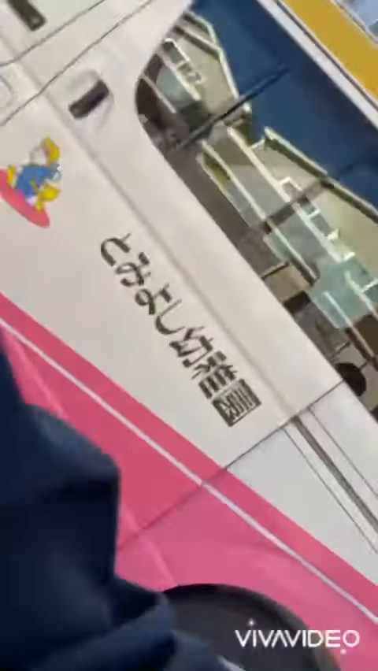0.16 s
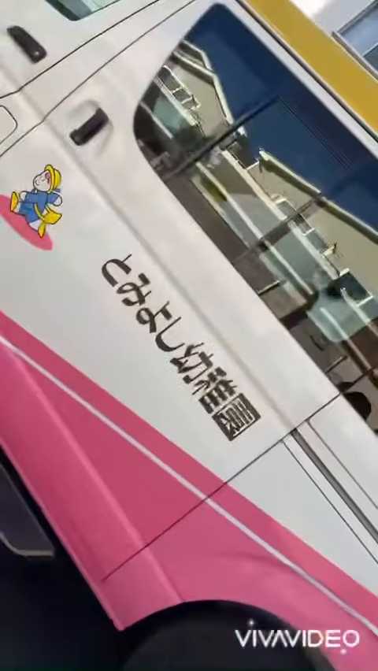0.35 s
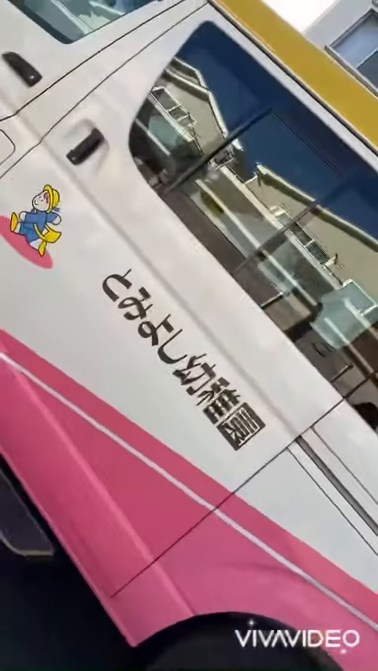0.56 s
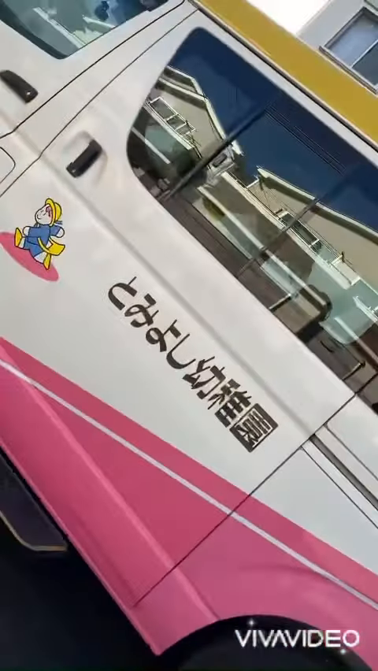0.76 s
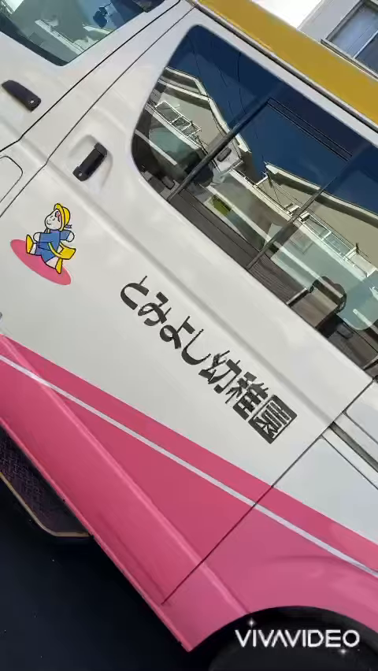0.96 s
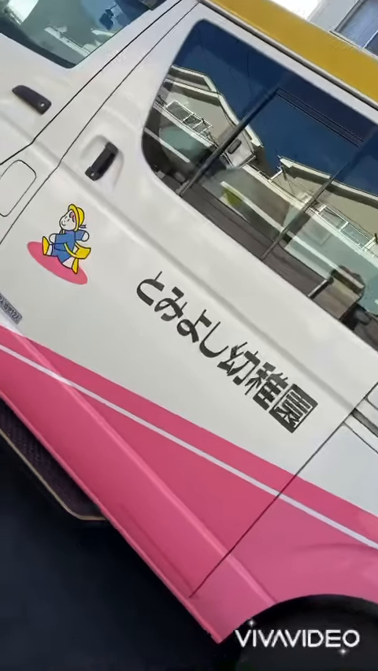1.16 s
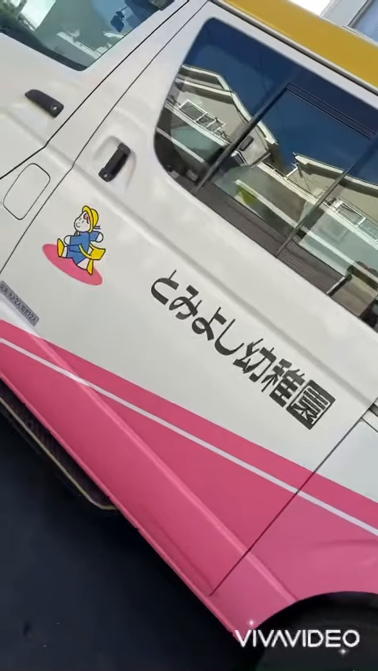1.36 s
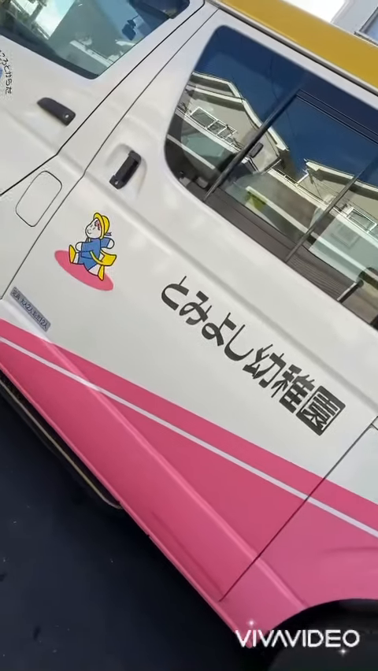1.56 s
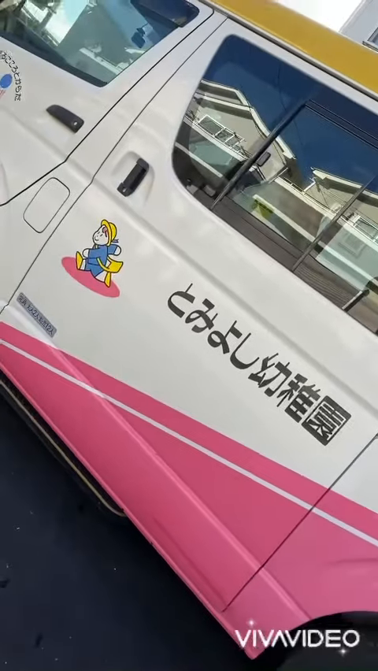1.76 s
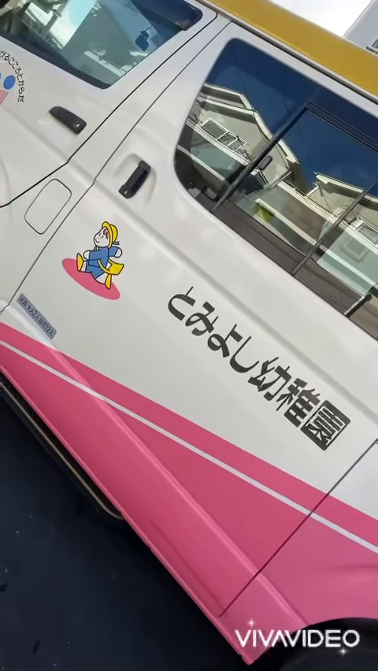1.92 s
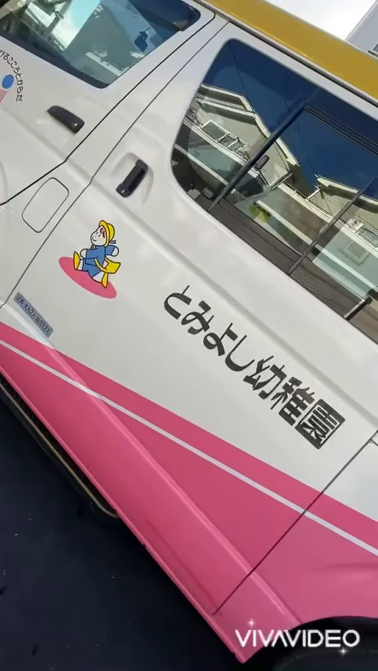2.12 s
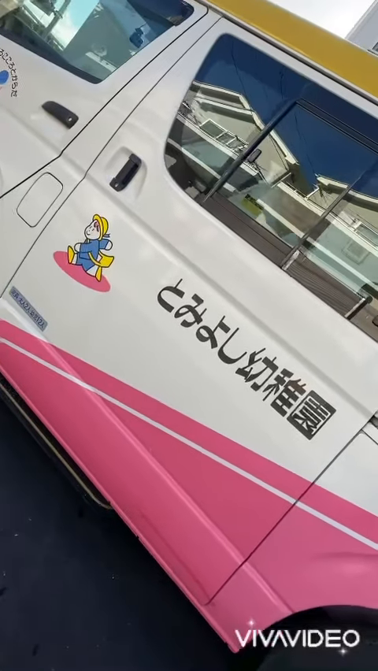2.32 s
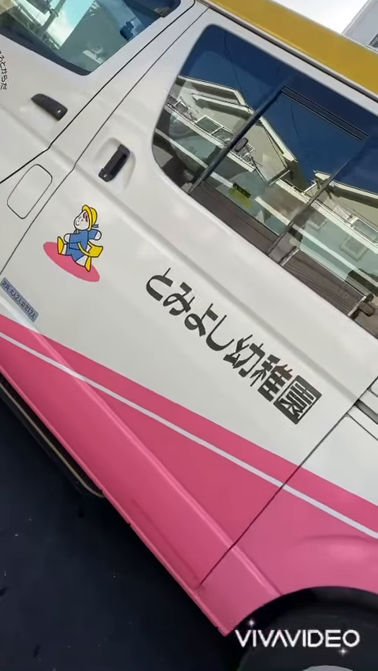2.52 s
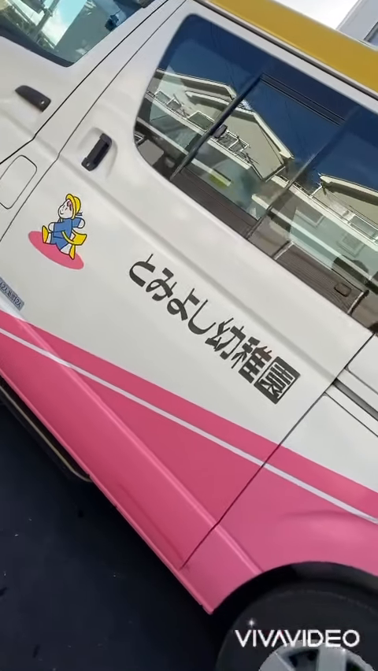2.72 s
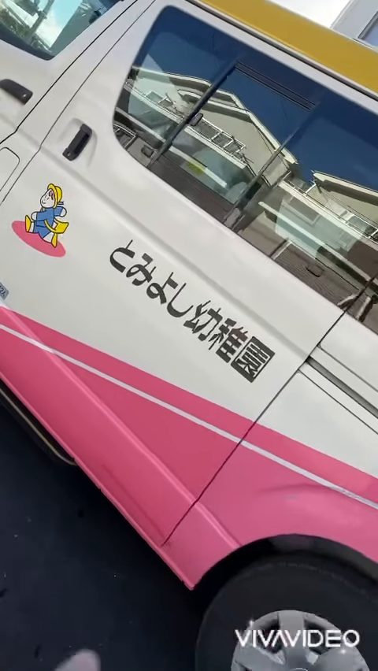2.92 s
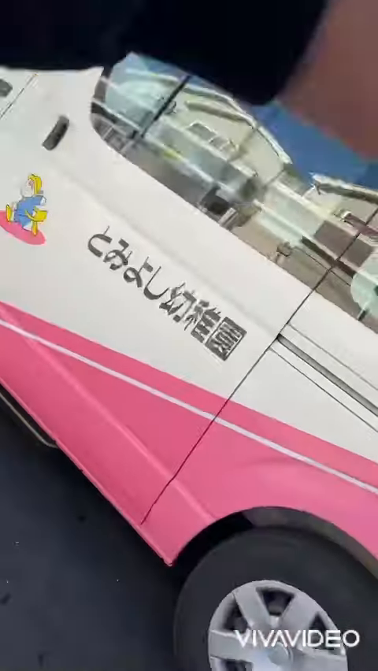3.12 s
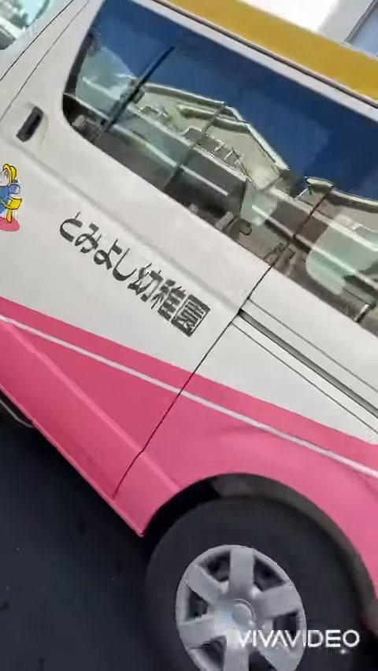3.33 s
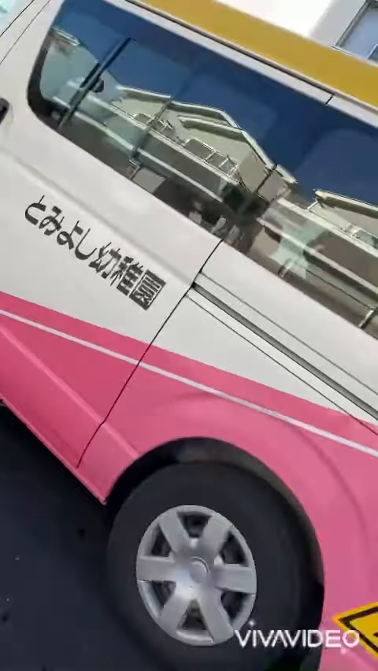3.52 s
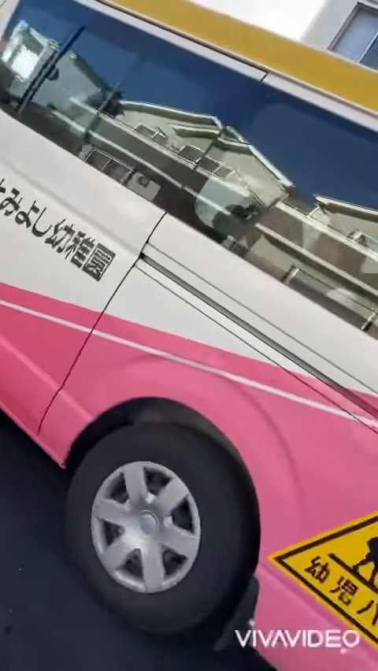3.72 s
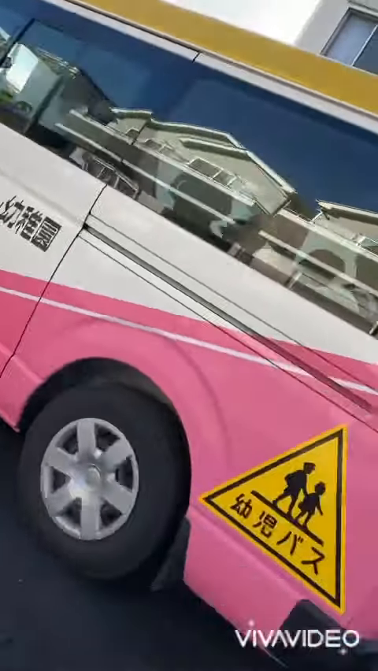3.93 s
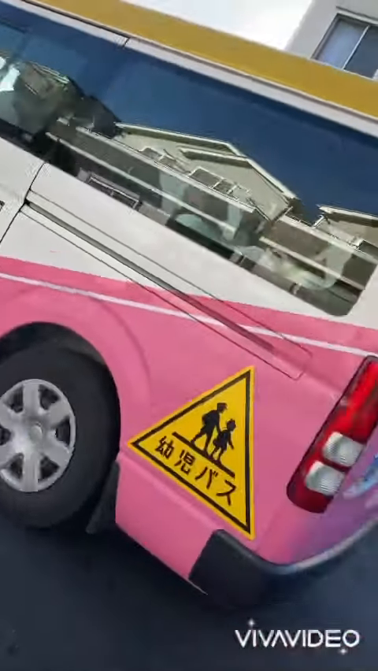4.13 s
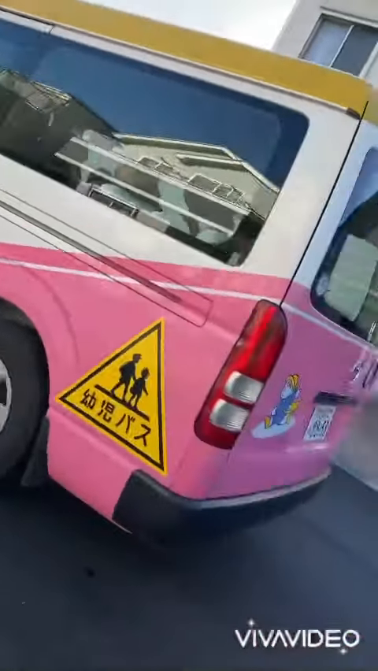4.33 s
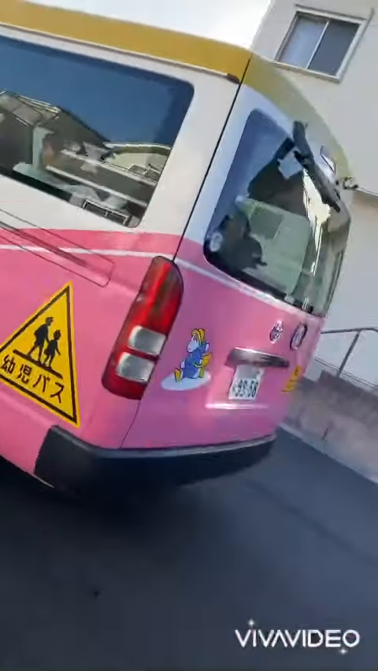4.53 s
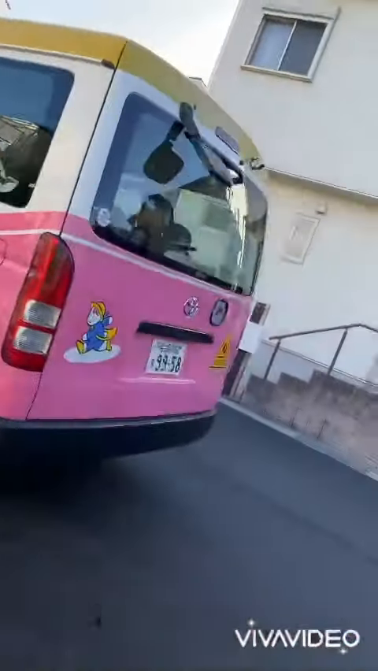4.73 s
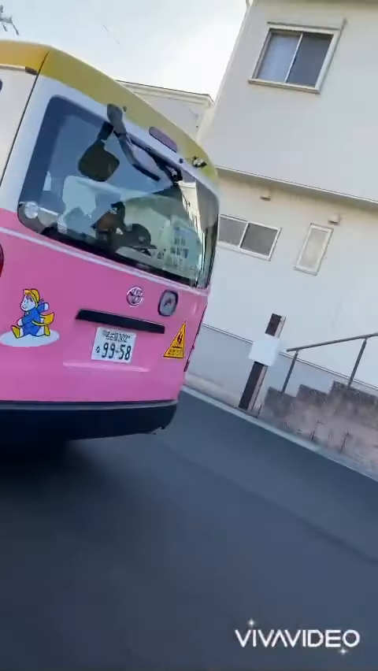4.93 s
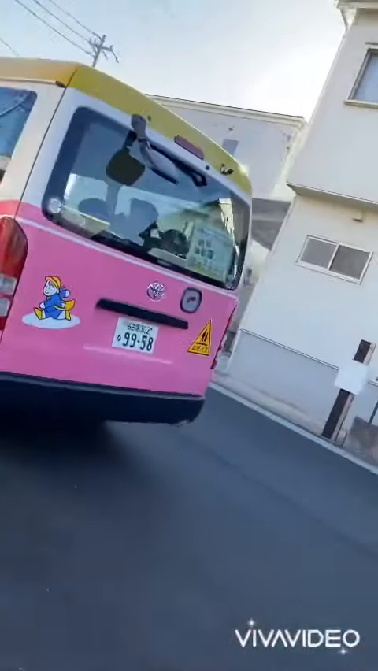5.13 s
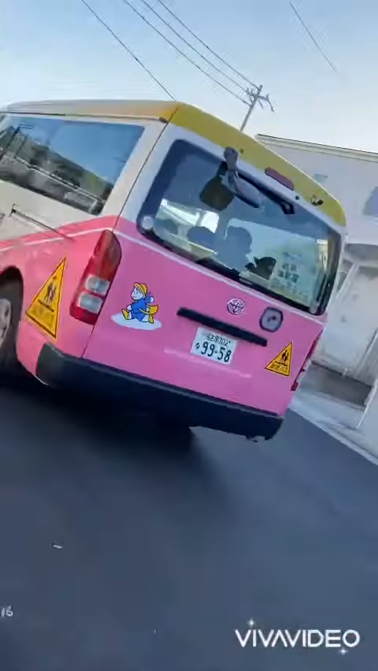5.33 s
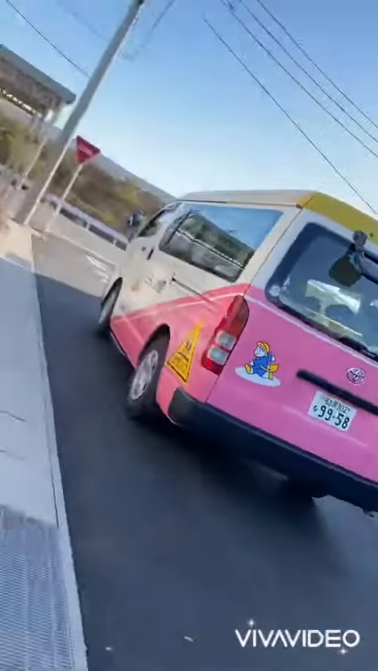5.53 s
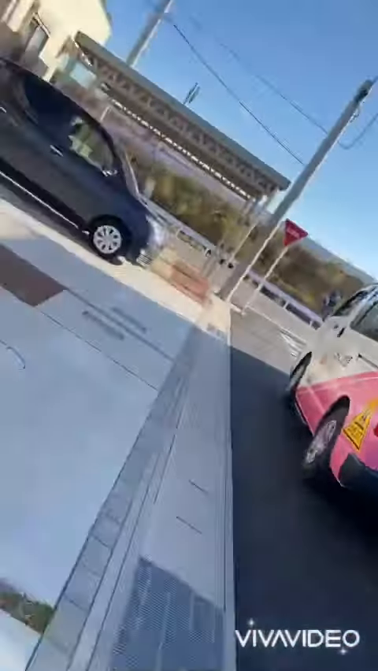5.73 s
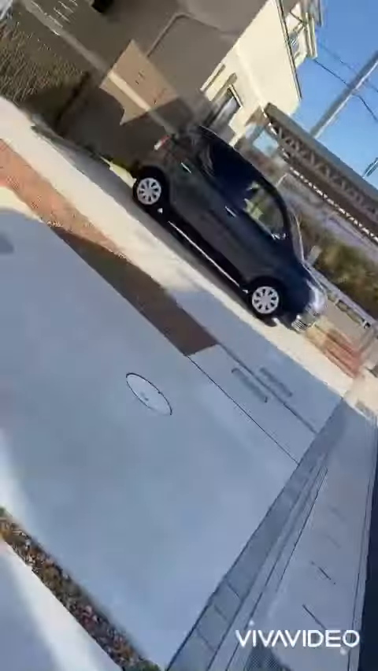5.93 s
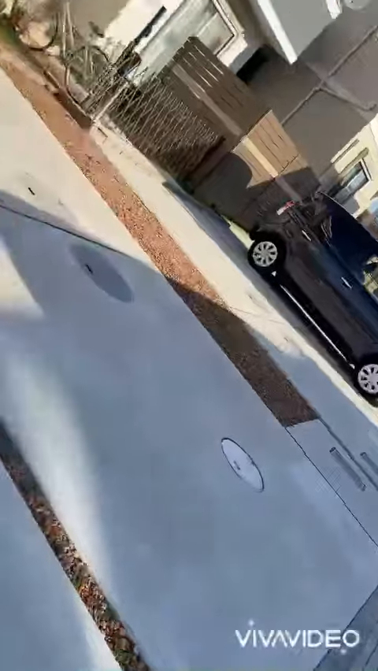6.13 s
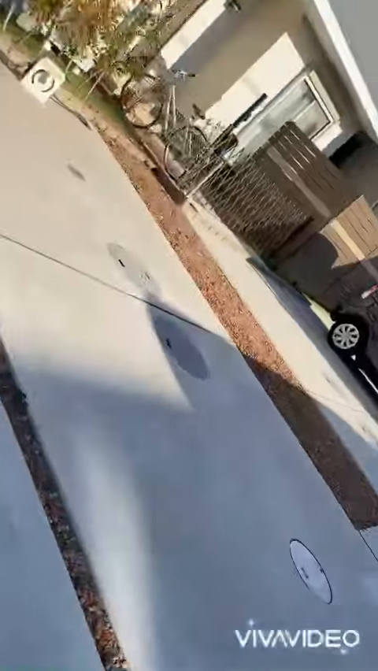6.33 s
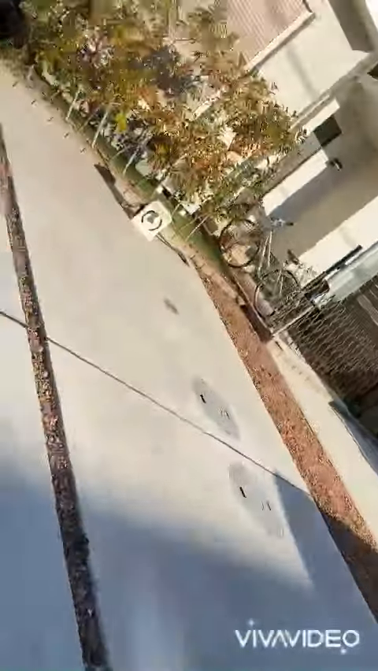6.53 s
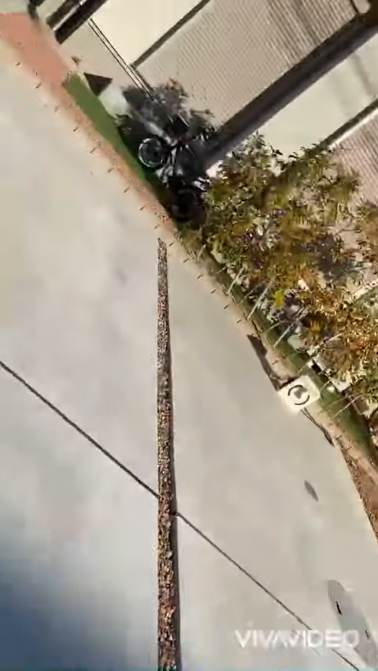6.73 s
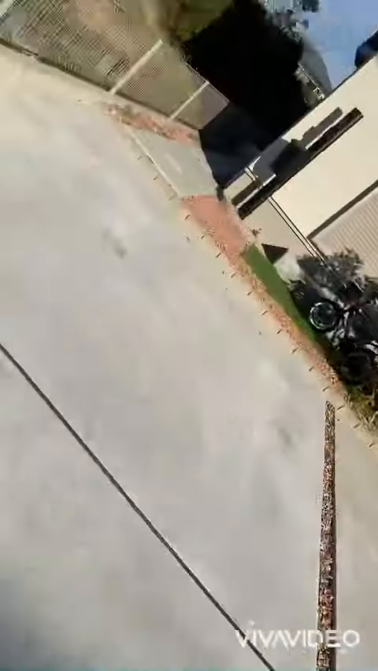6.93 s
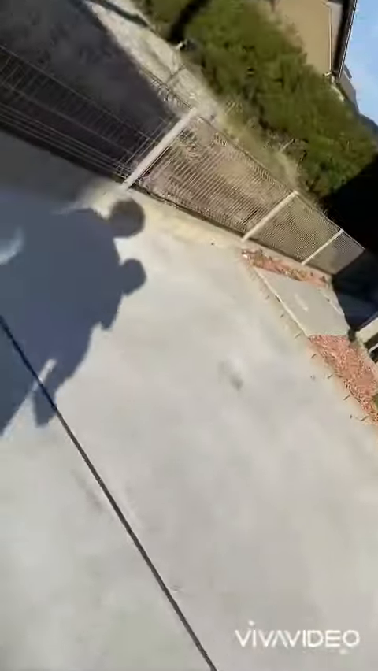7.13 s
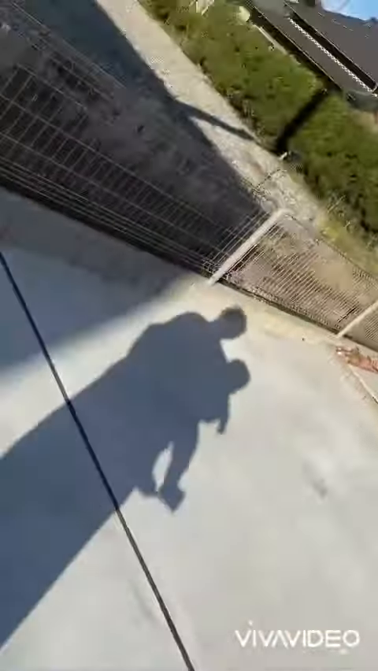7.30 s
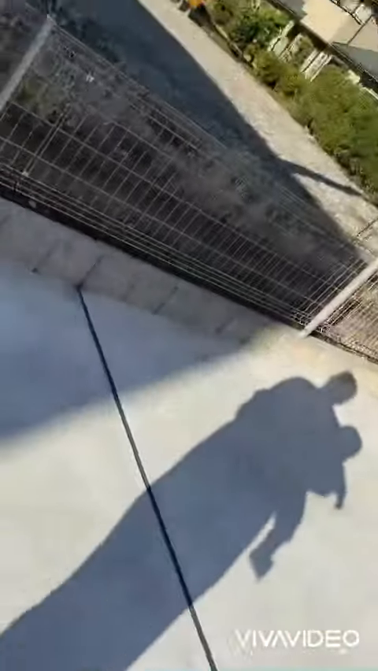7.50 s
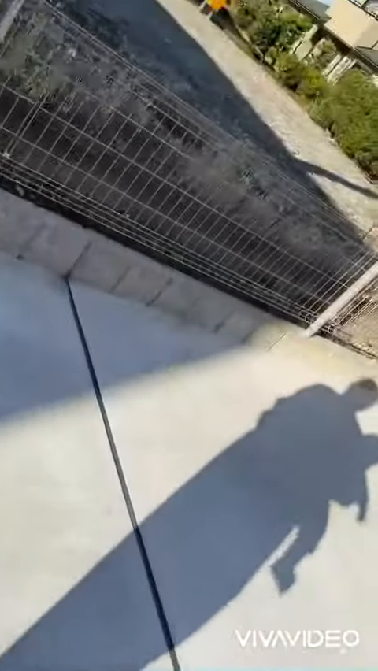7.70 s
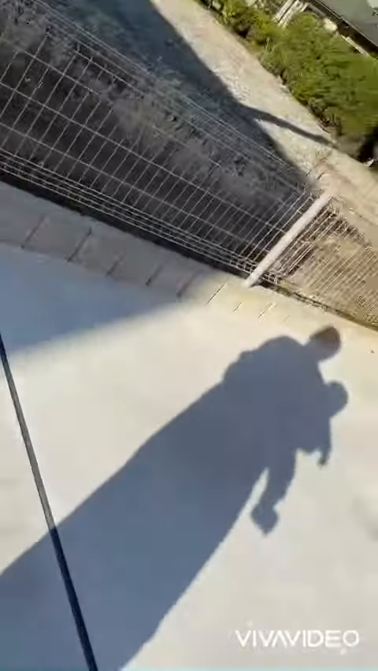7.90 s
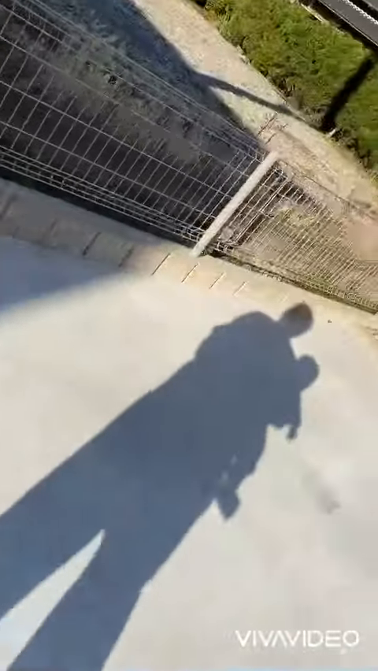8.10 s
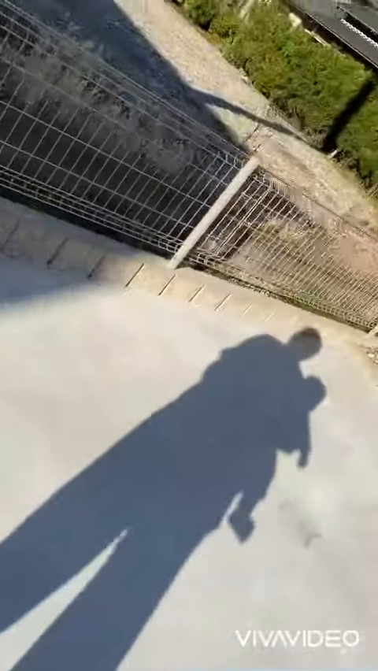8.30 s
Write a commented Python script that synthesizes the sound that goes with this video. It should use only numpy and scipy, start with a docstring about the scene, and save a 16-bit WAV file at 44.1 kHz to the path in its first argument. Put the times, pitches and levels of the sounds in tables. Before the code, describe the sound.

A minibus's sliding door rolls and slams twice, then the engine pulls away close by and fades as small birds chirp.

```python
"""A minibus shuts its door and leaves

A minibus idles in a quiet street. Its sliding door rolls along the rail and slams, twice, making
the steel ring and the air inside thump. It pulls away close by: the engine bay hisses past, then
the tailpipe drones with the engine's firings and fades. Small birds chirp and shoes scuff concrete."""
import sys
import numpy as np
from scipy import signal
from scipy.fft import rfft, irfft, next_fast_len
from scipy.io import wavfile
from scipy.ndimage import uniform_filter1d

SR = 44100
rng = np.random.default_rng(int(sys.argv[2]) if len(sys.argv) > 2 else 0)


def pcm_store(signal):
    """Save signal as 16-bit PCM."""
    levels = np.round(np.clip(np.atleast_2d(signal), -1, 1) * 32767)
    wavfile.write(sys.argv[1], SR, levels.astype(np.int16).T)


N = 372909


def from_db(db):
    """Turn decibels into a gain."""
    return 10 ** (np.asarray(db) / 20)


def rms_one(x):
    """Scale a sound to an average strength (rms) of 1."""
    return x / np.sqrt(np.mean(x ** 2) + 1e-20)


def mid_one(x):
    """Scale a stereo sound so that the average of left and right has strength 1."""
    return x / np.std(x.mean(axis=0))


def seconds():
    """The time of every sample."""
    return np.arange(N) / SR


def in_time(rows):
    """Join a table's values with straight lines over time."""
    times, values = np.transpose(rows)
    return np.interp(seconds(), times, values)


def at_hz(points, hz):
    """Read a table between its rows, on a scale of octaves."""
    pitches, values = np.transpose(points)
    return np.interp(np.log(hz + 1e-9), np.log(pitches), values)


def ramp(start_s, length_s):
    """Rise evenly from 0 to 1."""
    return np.clip((seconds() - start_s) / length_s, 0, 1)


def held(start_s, rise_s, hold_s, fall_s):
    """Rise to 1, stay there, then fall to 0."""
    return ramp(start_s, rise_s) - ramp(start_s + rise_s + hold_s, fall_s)


def swell(peak_s, rise_db_per_s, fall_db_per_s):
    """Grow to 1 and die away."""
    t = seconds() - peak_s
    return from_db(-np.abs(np.where(t < 0, rise_db_per_s, fall_db_per_s) * t))


def drift(rate_hz):
    """A smooth random wobble, about 1 in size."""
    r = np.exp(-80 * np.pi * rate_hz / SR)
    slow = signal.lfilter([1], [1, -2 * r, r * r], rng.standard_normal(N // 40 + 2002))[2000:]
    return np.interp(np.arange(N) / 40, np.arange(len(slow)), rms_one(slow))


def filtered(x, order, hz, kind="low"):
    """Keep the lows, the highs or a band; a higher order cuts more sharply."""
    return signal.sosfilt(signal.butter(order, hz, kind, fs=SR, output="sos"), x)


def pan(left_db):
    """Gains that make the left side louder than the right."""
    return from_db(np.array([[left_db], [-left_db]]) / 2)


# How alike left and right are (1 the same, -1 opposite): pitch_hz, likeness
LIKENESS = [(40, -0.052), (70, -0.49), (125, -0.07), (190, 0.19), (300, 0.75), (430, 0.18), (720, -0.36),
            (1150, -0.55), (1800, 0.1), (3800, -0.28), (5500, 0.02), (7200, -0.61), (8300, -1.1),
            (11400, -.998), (12600, -0.81), (16000, 0.01)]
def stereo(mid, side, hz):
    """Make left and right from a shared part (mid) and an opposite part (side)."""
    alike = np.clip(at_hz(LIKENESS, hz), -.999, .999)
    mid, side = np.sqrt(1 + alike) * mid, np.sqrt(1 - alike) * side
    return np.array([mid + side, mid - side])


def noise(colour):
    """Stereo noise of strength 1; its colour table says how strong each pitch is."""
    size = next_fast_len(N)
    hz = np.arange(size // 2 + 1) * SR / size
    mid, side = rfft(rng.standard_normal((2, size))) * from_db(at_hz(colour, hz))
    return rms_one(irfft(stereo(mid, side, hz), size)[:, :N])


def clicks(times, heights):
    """One tiny push at each time."""
    out = np.zeros(N)
    out[np.clip(np.round(times * SR).astype(int), 0, N - 1)] = heights
    return out


def ring(force, hz, ring_s):
    """Each push starts a tone that fades by 60 dB in ring_s."""
    decay, step = from_db(-60 / (ring_s * SR)), 2 * np.pi * hz / SR
    return signal.lfilter([0, np.sin(step)], [1, -2 * decay * np.cos(step), decay ** 2], force + 1e-18)


def dying(times, level_db, fade_s):
    """A gain that jumps at each blow and fades by 60 dB in fade_s."""
    decay = from_db(-120 / (fade_s * SR))
    return np.sqrt(signal.lfilter([1], [1, -decay], clicks(times, from_db(level_db) ** 2) + 1e-18))


def struck(tones, times, level_db, spread_db):
    """Every blow rings each of an object's tones with a random strength and sign."""
    out, chance = 0, rng.uniform(-1, 1, (len(times), len(tones), 4))
    for k, (hz, tone_db, ring_s) in enumerate(tones):
        strength = from_db(level_db + tone_db + spread_db * chance[:, k, :2].T)
        forces = strength * np.sign(chance[:, k, 2:].T)
        mid, side = [ring(clicks(times, force), hz, ring_s) for force in forces]
        out = out + stereo(mid, side * min(hz / 750, 1), hz) / 2   # long waves reach both sides alike
    return uniform_filter1d(uniform_filter1d(out, size=4), size=4)   # a contact lasts about 0.1 ms


def street_echo(x, dull_above_hz, fade_s=.56):
    """House fronts scatter a short, dull echo."""
    t = seconds()[:SR]
    tail = rng.standard_normal((2, SR)) * from_db(-60 * t / fade_s) * (t > .012)
    tail = rms_one(filtered(tail, 1, dull_above_hz)) / np.sqrt(SR)
    return signal.fftconvolve(x, tail, axes=-1)[:, :N]


# Deep rumble, hollow hum, road roar and thin air, as noise colours: pitch_hz, level_db
RUMBLE = [(20, -34), (30, -16), (42, 1), (59, 11), (75, 1.5), (100, 4), (140, 3.5), (180, -6.5), (260, -47)]
HUM = [(110, -15.5), (160, 1), (240, 2.5), (300, -2), (380, 1), (490, -2), (620, -5.5), (740, -10.5),
       (900, -21.5), (1400, -55.5)]
ROAD = [(300, -33), (560, -3), (720, 3.5), (900, 9), (1150, 6.5), (1500, 4), (2200, -8.5), (4000, -39.5)]
AIR = [(1600, -6.5), (2500, 5), (3800, 12), (4800, 4.5), (5800, 4), (7200, -6.5), (9500, -37.5),
       (12000, -17.5), (14000, -14.5), (16000, -31.5)]
def background():
    """Low wind, the hum and air of the town, and far traffic that comes up once the bus has gone."""
    wind = from_db(-42.5) * mid_one(noise(RUMBLE))
    town = from_db(-52) * mid_one(noise(HUM)) + from_db(-65.5) * noise(AIR)
    traffic = from_db(-51) * ramp(7.13, .8) * noise(ROAD)
    return wind + town + traffic


# The noise of a sole on grit: pitch_hz, level_db
GRIT = [(300, 10), (1200, 10), (2500, 2), (3700, 6.5), (6000, 4), (9000, -1), (14000, 1.5), (16000, -15)]
# Shoe scuffs: start_s, length_s, level_db
SCUFFS = [(7.053, .047, -57), (7.424, 0.16, -49.5), (7.983, 0.18, -47)]
def shoes():
    """A sole catches sharply, then drags over grit and loses force."""
    drag = sum(from_db(db) * held(s, .0079, .66 * length, .45 * length) * swell(s, 0, fall_db_per_s=64)
               for s, length, db in SCUFFS)
    return drag * from_db(2.3 * drift(120)) * noise(GRIT)


def bird_note(start_s, length_s, hz, level_db, fall, arch, upper_db, rasp):
    """A bird's throat sings two tones at once; fall, arch and rasp are shares of the pitch."""
    progress = np.linspace(0, 1, int(length_s * SR))
    glide = 1 - fall * (progress - .5) - arch * np.abs(2 * progress - 1) ** 1.2
    pitch = hz * glide * (1 + rasp * drift(230)[:len(progress)])
    lower, upper = np.sin(2 * np.pi * np.cumsum([pitch, pitch + 632], axis=1) / SR)
    sound = from_db(level_db) * np.sin(np.pi * progress) * (lower + from_db(upper_db) * upper)
    return np.pad(sound, (int(start_s * SR), N))[:N]


# Short falling chirps: start_s, middle_pitch_hz, level_db
CHIRPS = [(6.637, 5380, -49.5), (6.737, 5248, -56), (6.843, 5050, -53.5), (6.99, 4000, -50.5),
          (7.158, 3926, -48.5), (7.292, 3898, -49), (7.438, 3730, -49.5), (8.186, 4250, -45.5),
          (8.304, 4000, -46.5)]
# Calls that rise and fall: start_s, length_s, top_pitch_hz, level_db, fall_share
CALLS = [(7.814, 0.0325, 3600, -47.5, 0.02), (7.864, 0.088, 3950, -41, 0.0618)]
def birds():
    """Small birds give raspy falling chirps and two arched calls, which echo in the street."""
    song = sum(bird_note(s, .047, hz, db, fall=.146, arch=0, upper_db=-16, rasp=.042)
               for s, hz, db in CHIRPS)
    song += sum(bird_note(*call, arch=.23, upper_db=-9, rasp=.027) for call in CALLS)
    song = np.array([song, np.roll(song, shift=3)]) * from_db(2.5 * drift(150))
    return song + from_db(-12) * street_echo(song, dull_above_hz=7000)


# The low tones of the cabin's air and shell: pitch_hz, level_db, ring_s
CABIN = [(31, -7.5, 0.22), (44.8, -8.5, 0.27), (65, 0, 0.36), (86, -5.5, 0.083), (106.5, -6, 0.31),
         (140, -23.5, 0.064)]
def shell():
    """The hollow steel body and the air in it roar at the first slam, then die away."""
    air = sum(from_db(db) * ring(rng.standard_normal(N), hz, ring_s) for hz, db, ring_s in CABIN)
    roar = from_db(-22.5) * rms_one(air) + from_db(-19) * mid_one(noise(HUM))
    roar += from_db(-36) * noise(ROAD)
    return swell(peak_s=.074, rise_db_per_s=1, fall_db_per_s=46) * roar


# The tones of a loose catch: pitch_hz, level_db, ring_s
CATCH = [(400, 2.5, .02), (720, 2, .012), (1050, 1.5, .012), (1460, -5.5, .012), (2600, -10, 0.0041),
         (4000, -7.5, 0.0037), (5000, -2.5, .004)]
# Its hits: start_s, level_db
CLACKS = [(.3403, -21), (.3503, -17.5), (.3532, -12.5)]
def loose_catch():
    """A loose catch strikes its stop: a few hard, dead clacks."""
    times, level_db = np.transpose(CLACKS)
    return struck(CATCH, times, level_db, spread_db=1.5)


# The tones of the door panel: pitch_hz, level_db, ring_s
PANEL = [(187.4, -7, 0.14), (216, -3.5, 0.16), (247.3, -4.5, 0.13), (270, -6.5, 0.08), (303, -3.5, 0.1),
         (333, -17.5, 0.23), (428.4, -3, 0.12), (445, -7.5, 0.11), (484, -0.5, 0.053), (518, -2.5, 0.097),
         (592, -1, 0.055), (651, -4, 0.056), (720, -1, 0.05), (1080, -10, 0.025)]
# The noise of hard door parts meeting: pitch_hz, level_db
CRACK = [(600, 12.5), (1200, 11.5), (1600, -6), (2200, 5), (2800, -7), (3500, -1.5), (4300, -7),
         (5500, -5.5), (7500, -8.5), (10000, -61), (12500, -10), (15000, -17.5), (16500, -30.5)]
# Runs along the rail: start_s, rise_s, hold_s, fall_s, level_db
ROLLS = [(0.097, 0.065, 0.23, 1, -32.5), (1.034, 0.18, 0.086, 0.052, -31.5)]
def rollers(bumps_per_s):
    """Rollers bump and grind along the rail and shake the door panel."""
    gain = sum(from_db(db) * held(*shape) for *shape, db in ROLLS)
    span = 2 * SR
    bump_times = np.flatnonzero(rng.random(span) < bumps_per_s / SR) / SR
    damped_panel = [(hz, db, ring_s / 4) for hz, db, ring_s in PANEL]
    shake = rms_one(struck(damped_panel, bump_times, 0, spread_db=.5)[:, :span])
    grind = from_db(-17) * noise(CRACK) + from_db(-1) * noise(HUM) + from_db(-11) * noise(ROAD)
    return gain * (np.pad(shake, ((0, 0), (0, N - span))) + grind)


# The two slams: landing_s, panel_db, thump_db, crack_db, latch_db, thud_db
SLAMS = [(.113, -5.5, -13, -12, -30, -12.5), (1.4698, -14, -38, -24, -24.5, -9)]
# In each slam a faint swell leads in, the catch touches, the latch snaps and the panel lands: before_landing_s,
# added_panel_db, added_crack_db, added_latch_db
SLAM_STEPS = [(.019, -13.5, -10.5, -13.5), (.013, -5.5, 0, -10), (0.0059, -11.5, -2, -1),
              (0.00009, -1, -0.5, -7)]
def door_clunks():
    """The latch snaps over with a short ping, then the whole door thuds against its seals."""
    times, *_, latch_db, thud_db = np.transpose(SLAMS)
    snap_times = times - SLAM_STEPS[-2][0]
    snap = ring(clicks(snap_times, from_db(latch_db + 8)), hz=1560, ring_s=.018)
    return uniform_filter1d(snap, size=5) - door_thud(times, thud_db)


# The tones of the whole door stopping: pitch_hz, level_db, ring_s
THUD = [(243, -3.5, 0.055), (252, -16.5, 0.18), (453, 2, .045)]
def door_thud(times, level_db):
    """The door stops against its seals with a few low, softened tones."""
    thud = sum(ring(clicks(times, from_db(level_db + db)), hz, ring_s) for hz, db, ring_s in THUD)
    return uniform_filter1d(thud, size=36)


# The door bounces and knocks in its track: start_s, panel_db, crack_db
KNOCKS = [(.016, -21.5, -18.5), (.123, -7.5, -14.5), (.136, -9.5, -22.5), (.145, -12.5, -17.5),
          (.207, -10.5, -25), (0.227, -18.5, -28.5), (.283, -22, -38), (0.356, -20, -32.5),
          (0.399, -27, -32), (0.499, -22.5, -39), (.547, -26.5, -38.5), (0.646, -30, -45),
          (1.157, -34, -37), (1.194, -26, -37.5), (1.242, -23, -33.5), (1.258, -28, -35),
          (1.288, -36, -36.5), (1.522, -25.5, -47)]
def door_blows():
    """List every slam step and knock: start_s, panel_db, thump_db, crack_db, latch_db."""
    slams = [(s - early_s, panel + add_panel, thump + add_panel, crack + add_crack, latch + add_latch)
             for s, panel, thump, crack, latch, _ in SLAMS
             for early_s, add_panel, add_crack, add_latch in SLAM_STEPS]
    knocks = [(s, panel, panel - 2, crack, crack - 13.5) for s, panel, crack in KNOCKS]
    return np.transpose(slams + knocks)


# The tones of the steel latch, and of loose rollers and trim: pitch_hz, level_db, ring_s
LATCH = [(1340, -0.5, 0.091), (1383, 0.5, 0.11), (1502, 0, 0.085), (1584, -2.5, 0.08), (1693, 1, 0.12),
         (1900, -6.5, 0.12), (2000, -3.5, .07), (2120, -4, 0.12), (2400, -10, .08), (2690, -16, 0.17),
         (3990, -3.5, .04)]
TRIM = [(1604, -5.5, 0.032), (3570, -9.5, 0.065), (4300, -2, 0.021), (5030, -4, 0.031), (5650, -1, 0.042)]
# Light metal ticks: start_s, level_db
TICKS = [(1.41, -45), (1.845, -52), (2.11, -48.5), (2.423, -45)]
# Bright noise, for the ticks and the engine fan: pitch_hz, level_db
HISS = [(1600, -14), (2500, 9), (2950, 6.5), (3350, 8.5), (4000, 10.5), (5000, 1), (5700, 4), (7200, 2),
        (9500, -15), (12000, -10), (14000, -1), (16000, -22.5)]
def door_hits():
    """The latch cracks and rings, the panel booms and the cabin air thumps; loose trim rattles on."""
    times, panel_db, thump_db, crack_db, latch_db = door_blows()
    panel = struck(PANEL, times, panel_db, spread_db=4)
    thump = struck(CABIN, times, thump_db, spread_db=2)
    latch = struck(LATCH, times, latch_db, spread_db=3)
    trim = struck(TRIM, times, crack_db - 11.5, spread_db=5)
    crunch = uniform_filter1d(dying(times, crack_db, fade_s=.023), size=120)   # the crunch swells in softly rather than starting at once
    rattle = dying(times, crack_db - 11, fade_s=.22) * from_db(2.5 * drift(90))
    crack = (crunch + rattle) * noise(CRACK)
    tick_times, tick_db = np.transpose(TICKS)
    ticks = dying(tick_times, tick_db, fade_s=.081) * noise(HISS)
    hollow = uniform_filter1d(dying(times, panel_db - 18.5, fade_s=.29), size=200) * mid_one(noise(HUM))
    return panel + thump + hollow + latch * pan(4.1) + trim + crack * pan(.53) + ticks


MOVE_OFF_S, ACCELERATION_M_PER_S2, LOSS_DB_PER_M = 2.7, 1.484, .46
def passing_db(nearest_m, gap_m):
    """Level of a part of the bus that is closest, gap_m away, once the bus has travelled nearest_m."""
    travelled = ACCELERATION_M_PER_S2 * np.maximum(seconds() - MOVE_OFF_S, 0) ** 2 / 2
    distance = np.hypot(travelled - nearest_m, gap_m)
    return -20 * np.log10(distance / gap_m) - LOSS_DB_PER_M * (distance - gap_m)


def throttle():
    """The driver presses the pedal, holds it and lets go."""
    return held(start_s=2.393, rise_s=.8, hold_s=3.54, fall_s=.49)


def tail_passed():
    """Go from 0 to 1 as the back of the bus comes past."""
    return ramp(start_s=3.76, length_s=.99)


def ground_echo(x, strength):
    """The road returns the sound a little later; the delay shrinks as the bus moves off."""
    t = seconds()
    delay_s = np.interp(t, [0, 3, 8.46], [.008, .0065, .002])
    echo = np.array([np.interp(t - delay_s, t, channel) for channel in x])
    return (x + strength * echo) / np.hypot(1, strength)


def squeak(pitch_hz):
    """One brief thin squeak as the bus rolls past."""
    gain = from_db(-47.5) * np.sin(np.pi * ramp(start_s=4.62, length_s=.091))
    return gain * np.sin(2 * np.pi * pitch_hz * seconds())


# How often the engine fires: time_s, rate_hz
FIRING = [(0, 36.86), (.6, 38.9), (1.1, 38.16), (1.95, 37.38), (2.45, 40.38), (2.75, 40.67), (2.98, 38.57),
          (3.2, 37.9), (3.55, 38.01), (4, 36.47), (4.3, 36.61), (4.7, 38.6), (5.05, 39.47), (5.47, 39.81),
          (6.1, 41.24), (6.6, 41.9), (6.87, 41.7), (7.05, 39.06)]
def firing_phase(jitter):
    """An angle that makes one slightly unsteady turn for each firing of the engine."""
    rate_hz = in_time(FIRING) * (1 + jitter * drift(7.96))
    return 2 * np.pi * np.cumsum(rate_hz) / SR


# The tones of the bus's body: pitch_hz, level_db, ring_s
BODY_TONES = [(100, -5, 0.33), (130, -2, 0.22), (231.2, -1.5, 0.69), (325.5, -6, 0.18), (434, -10.5, 0.057),
              (510, -10.5, 0.045), (604, -19.5, 0.049)]
def shudder(phase):
    """As the bus pulls away, firings and random shaking make its body ring."""
    firings = rms_one(np.diff(np.floor(phase / (2 * np.pi)), prepend=0))
    force = rng.standard_normal((2, N)) + from_db(-2.5) * firings
    shake = sum(from_db(db) * mid_one(stereo(*ring(force, hz, ring_s), hz))
                for hz, db, ring_s in BODY_TONES)
    shake = rms_one(filtered(shake, 3, [85, 900], "band"))   # panels give off no deep bass or treble
    return from_db(-28.5) * swell(peak_s=3.19, rise_db_per_s=81.5, fall_db_per_s=26) * shake


def gear_whine(phase, teeth_per_firing):
    """The gears sing unsteadily as the rear passes."""
    waver = 1.2 * np.array([drift(35), drift(35)])
    whine = np.sin(teeth_per_firing * phase + waver) * from_db(2.4 * drift(25))
    return from_db(-44.5) * swell(peak_s=4.72, rise_db_per_s=36.5, fall_db_per_s=18.5) * whine


def road_roar():
    """The bus's side hides the soft roar of idling; then the tyres roar as the tail passes."""
    idle = from_db(-52.5) * (1 - ramp(3.62, .46))
    tyres = tail_passed() * from_db(-43 + passing_db(nearest_m=1.1, gap_m=5.6))
    return (idle + tyres) * from_db(2 * drift(13)) * noise(ROAD) * pan(3.5) ** tail_passed()


# The noise of the valves: pitch_hz, level_db
CLATTER = [(900, -27.5), (1300, -10.5), (1600, -2.5), (2000, -6), (2400, -11.5), (3000, -16.5),
           (4500, -43.5)]
def engine(phase):
    """Rumble under a hum that swells with each firing; valves clatter and the fan hisses."""
    bay_uncovered = ramp(2.94, .16)
    rumble_db = -34.5 + passing_db(nearest_m=0, gap_m=1)
    hum_db = -39.5 + 1.07 * throttle() + passing_db(nearest_m=2, gap_m=11.1)
    valve_db = -52 + 2.5 * bay_uncovered + passing_db(nearest_m=2.5, gap_m=2.94)
    fan_db = -57 + 9 * bay_uncovered + passing_db(nearest_m=.5, gap_m=3.5)
    rumble = from_db(rumble_db) * mid_one(noise(RUMBLE))
    hum = from_db(hum_db + .91 * np.cos(phase)) * mid_one(noise(HUM))
    valves = from_db(valve_db + .9 * np.cos(2 * phase) + 1.6 * drift(37)) * mid_one(noise(CLATTER))
    valves *= pan(1.5) ** tail_passed()
    fan = from_db(fan_db + .83 * np.cos(2 * phase) + 1.3 * drift(30)) * noise(HISS)
    return rumble + hum + ground_echo(valves + fan, strength=.45)


# The noise of gas leaving the tailpipe: pitch_hz, level_db
PUFF = [(200, -30.5), (400, -0.5), (660, 9), (900, -10), (1600, -9), (3000, -35.5)]
def tailpipe_gas(phase, roar_hz=493, ring_s=.02):
    """Gas puffs out with every firing, heard close behind the bus; at full flow the pipe roars."""
    pulse_db = 3 * np.cos(phase)
    gas = rng.standard_normal((2, N)) * from_db(pulse_db)
    ringing = ring(ring(gas, roar_hz, ring_s), roar_hz, ring_s)
    roar = from_db(-47.5) * held(5.63, .54, .52, .51) * mid_one(stereo(*ringing, roar_hz))
    puff_db = -46 + pulse_db + passing_db(nearest_m=3.5, gap_m=.8)
    return from_db(puff_db) * tail_passed() * mid_one(noise(PUFF)) + roar


# How the tailpipe boosts or weakens each pitch: pitch_hz, level_db
PIPE = [(40, -4), (80, -12.5), (120, -15), (150, -3.5), (165, -12), (200, -8), (222, -6.5), (234, 0),
        (240, 3.5), (255, -4), (285, -10), (300, -8.5), (313, 2), (338, 1), (355, -2), (376, -2.5),
        (400, -1.5), (414, -0.5), (428, -10), (441, -16), (452, -2.5), (463, -4.5), (471, -13), (490, -12),
        (515, -17.5), (560, -25)]
# Brief dips in single drone tones: firing_multiple, start_s, rise_s, hold_s, fall_s, change_db
DRONE_DIPS = [(8, 5.35, 0.23, 0.099, 0.29, -15), (10, 6.45, 0.17, .3, .2, -7.5)]
# Tones that throb as the engine works hard: firing_multiple, start_s, rise_s, hold_s, fall_s, level_db
THROBS = [(2, 2.95, .3, 0.45, 0.14, -31), (4, 3.15, 0.33, .12, 0.58, -36.5),
          (6, 3.05, 0.096, 0.48, 0.32, -40)]
# The silencer's boom: time_s, level_db
BOOM = [(0.45, -32), (0.54, -26), (1.03, -44), (1.07, -34), (2.19, -38.5), (2.34, -27), (3.06, -35),
        (3.08, -29.5), (3.68, -26.5), (4.08, -35), (4.6, -31), (5.85, -32), (6.16, -47.5), (6.78, -40.5),
        (7.14, -43), (7.16, -50), (8.23, -72), (8.46, -59)]
def exhaust(phase, odd_db=-3, uneven_db=-17):
    """Tones at multiples of the firing rate: the silencer booms and throbs, the tailpipe drones."""
    firing_hz = in_time(FIRING)
    start_angles = rng.uniform(0, 2 * np.pi, 20)

    def tone(multiple):
        angle = multiple * phase + start_angles[int(multiple)]
        return mid_one(stereo(np.sin(angle), np.cos(angle), multiple * FIRING[0][1]))

    def pipe_tone(multiple):
        dip_db = sum(db * held(*shape) for k, *shape, db in DRONE_DIPS if round(k) == multiple)
        level_db = at_hz(PIPE, multiple * firing_hz) + odd_db * (multiple % 2 == 1) + dip_db
        return from_db(level_db + 1.5 * drift(5)) * tone(multiple)

    drone = sum(pipe_tone(k) for k in range(1, 14))
    # Unequal cylinders add tones halfway between the others.
    drone += from_db(uneven_db) * sum(pipe_tone(k + .5) for k in range(3, 12))
    pipe_uncovered = ramp(3.41, 1)
    drone *= from_db(-80 + 22.5 * throttle() + 16 * pipe_uncovered)
    idle = from_db(-50.5 + passing_db(nearest_m=0, gap_m=1.7))
    throb = sum((idle + from_db(db) * held(*shape)) * from_db(drift(7.4)) * tone(round(k))
                for k, *shape, db in THROBS)
    boom = from_db(in_time(BOOM) - 1 + .7 * drift(7)) * tone(3)
    return boom + throb + drone


def scene():
    """The door and the bus in the street, with birds and shoes around them."""
    phase = firing_phase(jitter=.004)
    door = door_hits() + door_clunks() + loose_catch() + rollers(bumps_per_s=220)
    bus = exhaust(phase) + tailpipe_gas(phase) + engine(phase) + road_roar() + shudder(phase)
    bus += gear_whine(phase, teeth_per_firing=39.5) + squeak(pitch_hz=2210) + shell()
    door_echo = from_db(-16) * street_echo(door, dull_above_hz=2500)
    return bus + door + door_echo + birds() + shoes() + background()


def record(dry):
    """The bass is centred at first, then opens out and leans right; peaks are rounded, the top is cut."""
    mid, side = (dry[0] + dry[1]) / 2, (dry[0] - dry[1]) / 2
    narrow_side = filtered(side, 2, 630, "high")
    wide_side = side - .25 * filtered(mid, 1, 900)
    opened = ramp(start_s=3.73, length_s=.18)
    side = (1 - opened) * narrow_side + opened * wide_side
    rounded = 1.2 * np.tanh(np.array([mid + side, mid - side]) / 1.2)
    return signal.sosfilt(signal.ellip(10, .2, 80, 15800, fs=SR, output="sos"), rounded)


dry = scene()
out = record(dry)
pcm_store(out)
```